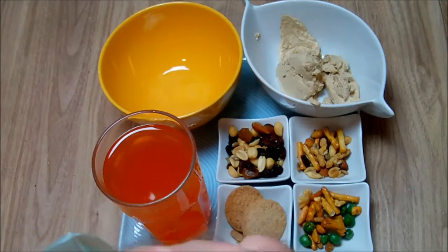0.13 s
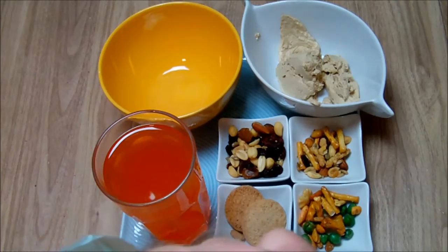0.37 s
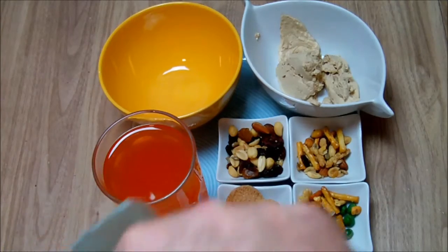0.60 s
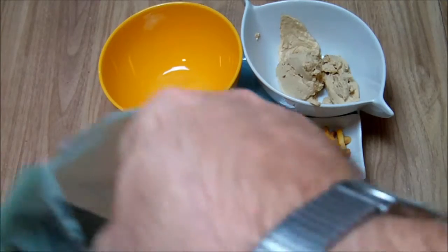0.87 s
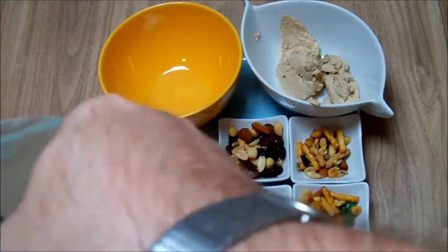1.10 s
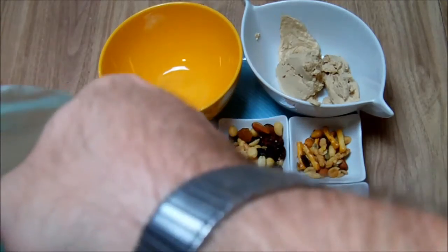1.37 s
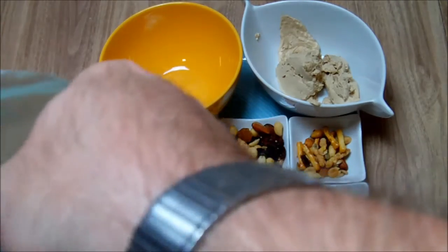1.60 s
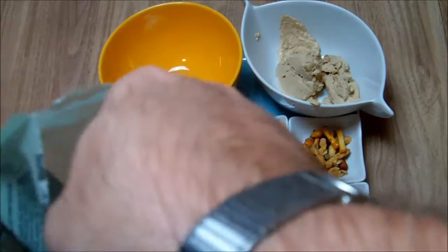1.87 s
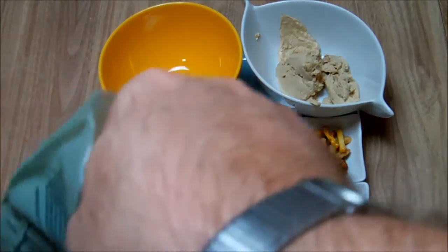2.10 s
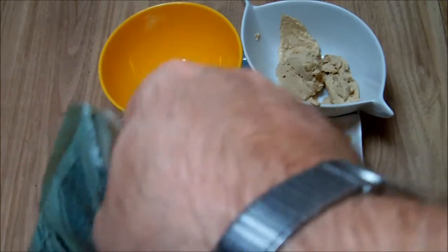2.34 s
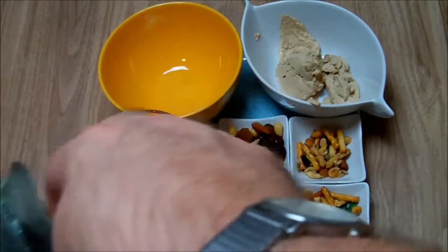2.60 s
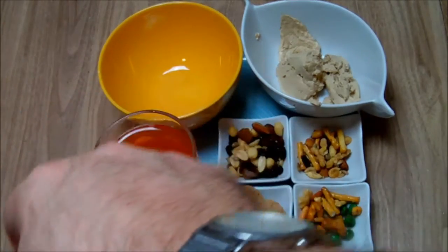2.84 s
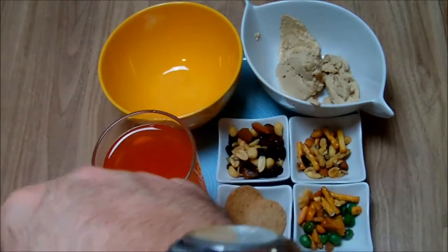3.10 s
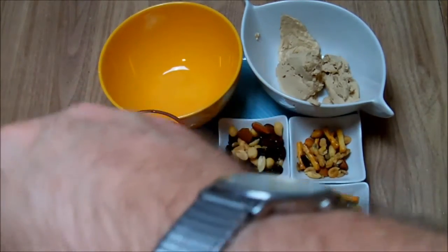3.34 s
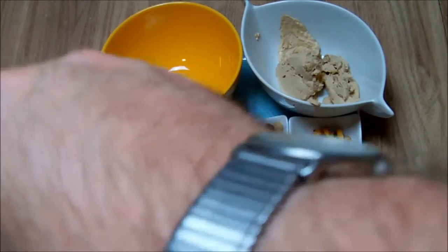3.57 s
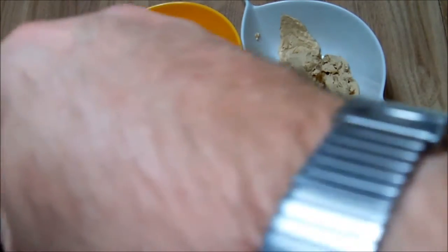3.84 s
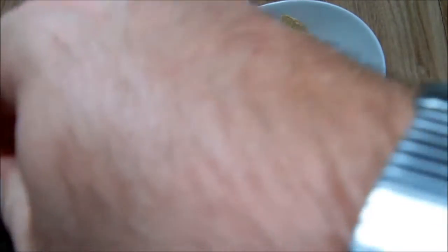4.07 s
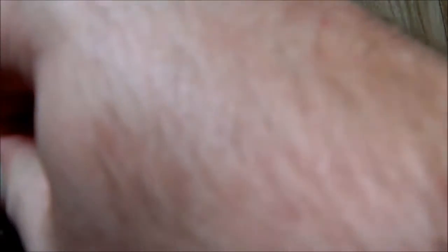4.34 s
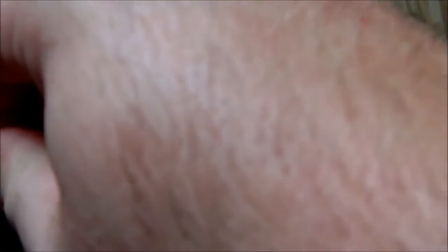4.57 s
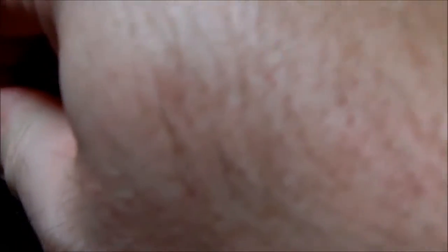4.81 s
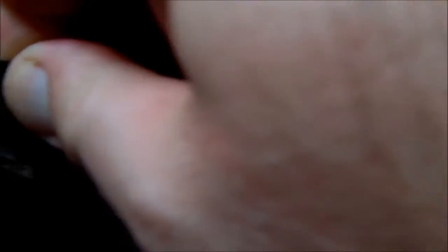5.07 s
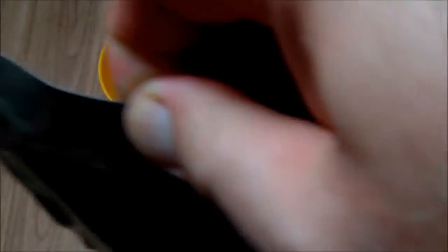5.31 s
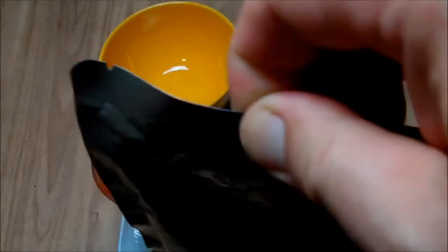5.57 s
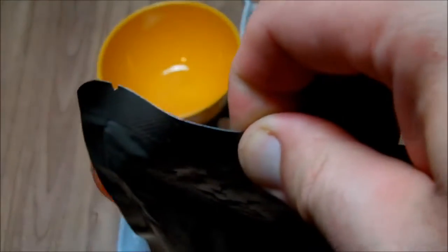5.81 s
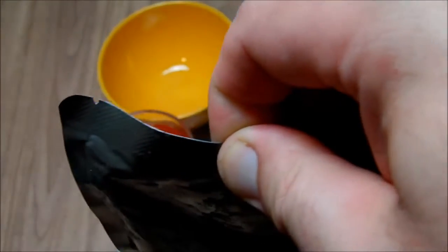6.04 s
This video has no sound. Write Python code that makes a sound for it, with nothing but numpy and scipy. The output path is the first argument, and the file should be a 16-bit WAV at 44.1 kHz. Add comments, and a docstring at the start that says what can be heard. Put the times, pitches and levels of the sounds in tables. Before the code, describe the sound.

In a quiet, bare room, a filled foil pouch is handled close to a single microphone. Several dry, middling snaps come in the first 0.4 seconds, then a brief lull. From 0.7 they resume, with very sharp, bright cracks near 1.0 and 1.1. After sparse ticks, crackling gathers from 1.75 and becomes densest and loudest around 2.05 to 2.25, with crushing rustle and fine finger scrape; busy snaps continue until 2.9. A crisp cluster follows at 3.2 to 3.45, then small, faint high ticks and soft rustling around 3.9 to 4.1. Isolated pops stand out near 4.57 and 4.72, fine crackle at 5.0, and a snap at 5.5. Bright cracks return at 5.85 and 5.95, ending in a sharp crinkling burst from 6.1. Dull crumples underlie the snaps; a soft room tail and slowly swelling airy hush remain behind.

```python
"""Over the hush of a quiet, bare room, a foil pouch snaps and ticks, close to a one-microphone camera.
Each snap of a crease or high tick of skin on film is a sharp flick and a rattle, with a dull crumple
of the filled body under it. The table gives a quick echo and the room a long soft tail.
Fingers slide on the film as a fine crackle, and the gripped sheet rustles: both are swarms of
random clicks, each a short noisy ring. The hush is shaped noise that slowly swells."""
import sys
import numpy as np
from scipy import signal
from scipy.fft import rfft, irfft, next_fast_len
from scipy.io import wavfile

SR = 44100
rng = np.random.default_rng(int(sys.argv[2]) if len(sys.argv) > 2 else 0)


def nominal_scale(level):
    """Amplitude ratio for a level in decibels (scalar or array-like)."""
    x = np.asarray(level, float) / 20
    return 10 ** x


def pcm_store(signal):
    """Save signal as 16-bit PCM."""
    levels = np.round(np.clip(np.atleast_2d(signal), -1, 1) * 32767)
    wavfile.write(sys.argv[1], SR, levels.astype(np.int16).T)


N = 272449
TIME = np.arange(N) / SR  # seconds


def shape(table, hz):
    """Gain of a (Hz, dB) table, read along a log frequency axis."""
    f, db = np.transpose(table)
    return nominal_scale(np.interp(np.log(hz + 1), np.log(f), db))


def colour(x, gain):
    """Filter by a gain function of Hz."""
    size = next_fast_len(x.shape[-1])
    spectrum = rfft(x, size) * gain(np.fft.rfftfreq(size, 1 / SR))
    return irfft(spectrum, size)[..., :x.shape[-1]]


def unit(x):
    """Scale to rms 1."""
    return x / np.sqrt(np.mean(x ** 2))


def peak(hz, centre_hz, width_hz):
    """Response of one resonance, gain 1 at its centre."""
    return 1j * hz * width_hz / (centre_hz ** 2 - hz ** 2 + 1j * hz * width_hz)


def ring_down(t, t60_s):
    """Exponential decay that falls 60 dB in t60_s."""
    return np.exp(-np.log(1000) * t / t60_s)


# Colour of the room's air. Each row: frequency in Hz, relative density in dB per Hz.
HUSH_COLOUR = [(12, -57), (20, -7.5), (70, -8), (357, -2), (759, -4), (949, -3.5), (1330, -2), (3070, -7),
               (5680, -13), (12400, -17), (14700, -22.5), (16000, -38)]
# The slow swell of the air. Each row: time in seconds, change of level in dB.
HUSH_SWELL = [(0, -2), (2, 4), (4, 4), (6.18, 7)]
HUSH_BASE_DB = -67.5  # rms before the swell


def hush():
    """Air of the room: noise with a fixed colour and a slowly swelling level."""
    noise = rng.standard_normal(N)
    air = unit(colour(noise, lambda hz: shape(HUSH_COLOUR, np.minimum(hz, 14700))))
    swell_db = np.interp(TIME, *np.transpose(HUSH_SWELL))
    return nominal_scale(HUSH_BASE_DB + swell_db) * air


# Snapping creases, and fine high ticks of skin on film. Each row: time in seconds, level in dB,
# resonance in Hz, lows in dB and highs in dB that set the tilt of the spectrum.
SNAPS_AND_TICKS = [(0.0476, -28, 854, -20.5, -6.5), (0.0996, -32, 3900, -14.5, -10),
                   (0.161, -50, 8000, -30, 1), (0.236, -53, 6000, -30, 0), (0.2587, -26, 1300, -12.5, 0),
                   (0.2998, -30.5, 3180, -26, -4), (0.3355, -27, 1360, -14, -7),
                   (0.342, -35.5, 9000, -30, 9), (0.687, -32, 1200, -27, -19), (0.6942, -38, 4000, -15, -3),
                   (0.714, -37, 1730, -7, -13), (0.7353, -30, 1780, -17, -2),
                   (0.7506, -22.5, 4020, -16.5, 3), (0.867, -39, 1960, -3, -17),
                   (0.933, -41.5, 1200, -6, -21), (0.9628, -39, 2240, -8, -21),
                   (0.9688, -33, 6900, -13, -23), (0.9834, -12.5, 12000, -20, 1.5),
                   (1.0346, -27.5, 4610, -21, 2), (1.0734, -32, 2220, -35, 2), (1.0927, -15, 8100, -19, 6),
                   (1.15, -25, 8500, -17.5, -5), (1.3882, -25, 2800, -25.5, -10),
                   (1.6088, -42, 1970, -12, -21), (1.7507, -28.5, 6550, -5, 3), (1.763, -27, 5500, -20, 2),
                   (1.7746, -33, 2010, -20, -13), (1.801, -30.5, 2370, -6, -3),
                   (1.8172, -24.5, 2190, -12, -1), (1.8286, -31.5, 2270, -24, -2),
                   (1.867, -30.5, 1940, -22, -37), (1.911, -25.5, 1770, -10, 2), (1.9173, -28, 1770, -2, 3),
                   (1.9255, -25, 2020, -17, 1), (2.065, -17, 3800, -5.5, 8.5),
                   (2.0796, -15, 5800, -11.5, -7), (2.0965, -16, 5360, -26, 3),
                   (2.117, -20.5, 2270, -6, -9), (2.1326, -18, 10300, -16, -17),
                   (2.1586, -35, 6210, -20, -10), (2.216, -18.5, 6840, -17, -1),
                   (2.2272, -20.5, 1960, -20, -9), (2.2397, -20.5, 8500, -25, -29),
                   (2.2552, -32, 2290, -18, -13), (2.346, -30.5, 3020, -31, -2.5),
                   (2.3678, -33, 1120, -9, -8), (2.4142, -26, 1110, -17.5, -11),
                   (2.484, -24, 2700, -32, -6), (2.5064, -31, 4040, -20, -14), (2.5287, -40, 2880, -24, 1),
                   (2.5566, -32, 10100, -32, -13), (2.5681, -37, 4310, -32, -9),
                   (2.59, -31, 10400, -30, -15), (2.5953, -29, 7450, -23, -26),
                   (2.6475, -19, 2850, -18, 4.5), (2.684, -25.5, 1810, -22, -2), (2.71, -21, 2300, -32, -6),
                   (2.7288, -26.5, 5080, -13, 0), (2.7615, -20.5, 8700, -14.5, -8),
                   (2.7792, -25.5, 5000, -24, -2), (2.806, -22.5, 3220, -36, 4),
                   (2.814, -29, 2880, -27, -11), (2.8572, -16, 9800, -15.5, 2),
                   (2.8875, -27, 2720, -13, -16), (3.1982, -25.5, 2980, -19, 0),
                   (3.202, -19, 2700, -16, 4.5), (3.2957, -20, 5800, -20, -5),
                   (3.3949, -30, 2570, -29, -29), (3.431, -31, 6160, -29, 3),
                   (3.458, -26.5, 1360, -7.5, -3), (3.57, -38.5, 1300, -36, -10),
                   (3.643, -35, 2820, -25, 0), (3.6533, -35, 3230, -23, -7), (3.7519, -41, 2000, -33, -10),
                   (3.909, -41.5, 9960, -22, 7), (3.945, -40, 10400, -27, 1),
                   (3.9517, -36.5, 10300, -24, 6), (3.9614, -36.5, 8840, -12, -7),
                   (3.9838, -31, 9500, -38, -8), (4.028, -33, 10100, -25, 6), (4.067, -32, 10400, -29, 3),
                   (4.125, -32.5, 3340, -25, 2), (4.2311, -39.5, 2040, -16, -47),
                   (4.4623, -38, 3230, -13, -42), (4.5691, -22.5, 2400, -35, -6.5),
                   (4.7191, -20.5, 4040, -19, -1), (4.949, -40, 10100, -25, 5), (5.002, -36, 9980, -23, -3),
                   (5.02, -30, 9350, -20, 12), (5.043, -33.5, 10200, -12, 6), (5.163, -40, 10100, -28, -3),
                   (5.4816, -27.5, 4270, -14.5, -5.5), (5.507, -34, 1180, -22, -11),
                   (5.7506, -38.5, 1850, -18, -25.5), (5.7899, -26.5, 2270, -10, -8),
                   (5.8452, -15, 10700, -19, 1), (5.852, -25, 9000, -25, 7), (5.8653, -31, 2520, -22, -16),
                   (5.8843, -32.5, 4860, -12, -19), (5.9477, -19.5, 3200, -13, -7),
                   (5.962, -30.5, 2000, -8, -25), (6.015, -29, 1940, -4.5, -38),
                   (6.031, -39, 1300, -4, -37), (6.048, -35, 2680, -4, -13), (6.099, -18.5, 10500, -33, 7),
                   (6.1589, -14.5, 6900, -18, 6)]
SNAP_LAG_S = .0008  # each flick sounds this long after its listed time
HISS_T60_S, DRUM_T60_S = 0.017, 0.042
RATTLE_DB = -8.5  # rattle after each flick


def snaps_and_ticks():
    """Each snap or tick is a sharp flick, then a resonant rattle that loses its treble first."""
    size, lead = 4096, 256  # samples; the lead leaves room for the filter's ringing ahead of the flick
    out, t = np.zeros(N + size), TIME[:size]
    hz = np.fft.rfftfreq(size, 1 / SR)
    rattles = rng.standard_normal((len(SNAPS_AND_TICKS), 2, size))
    for (s, db, ring_hz, low_db, high_db), (bright, dull) in zip(SNAPS_AND_TICKS, rattles):
        flick = 0.11 * bright * np.exp(t / -.0004)
        flick[0] += 1.6
        hiss = bright * ring_down(t, HISS_T60_S)
        drum = dull * ring_down(t, DRUM_T60_S)
        tilt = shape([(60, low_db - 41), (300, low_db - 4), (1000, low_db + 10), (2200, 0.5 * low_db + 8.5),
                      (4500, 0.049 * low_db + 0.17), (10000, high_db + 3.5), (16000, high_db - 8.0)], hz)
        resonance = 1.47 * peak(hz, ring_hz, 0.18 * ring_hz)
        muffled_drum = rfft(drum) / (1 + 1j * hz / 4000)
        wave = rfft(flick + nominal_scale(RATTLE_DB) * hiss) + nominal_scale(RATTLE_DB) * muffled_drum
        sound = np.roll(irfft(wave * (tilt + resonance)), lead)
        # the level follows the energy up to 64 samples past the flick
        sound = sound / np.sqrt(np.sum(sound[:lead + 64] ** 2) / 6)
        at = int((s + SNAP_LAG_S) * SR) - lead
        out[at:at + size] += nominal_scale(db) * sound
    return out[:N]


BUILD_DB = 30.5  # how far a movement climbs during its build-up


def effort(rows, fade_db_per_s, rest_db):
    """Level in dB of movements that build up, hold and fade; their powers add to that of a still hand."""
    power = nominal_scale(rest_db) ** 2
    for s, build_s, hold_s, db in rows:
        below_before = BUILD_DB * (s - TIME) / max(build_s, 1e-3)
        below_after = fade_db_per_s * (TIME - s - hold_s)
        drop = np.maximum(below_before, below_after)
        power = power + nominal_scale(db - np.clip(drop, 0, 99)) ** 2
    return 10 * np.log10(power)


def swarm(db, per_s, spread_db, ring_s):
    """Random clicks, many small and few large, each a short noisy ring; a higher level packs them closer."""
    rate = np.clip(per_s * nominal_scale(.6 * (db + 62.0)), 100, 6000)  # clicks per second
    sizes = nominal_scale(spread_db * np.minimum(rng.exponential(size=N), 4))
    clicks = (rng.random(N) < rate / SR) * sizes
    fade = ring_down(TIME[:2048], max(ring_s, 1e-3))
    power = signal.fftconvolve(clicks ** 2 / rate, fade ** 2)[:N]
    return unit(np.sqrt(np.abs(power)) * rng.standard_normal(N))


BODY_DB, BODY_RISE_S = -23.5, .015  # the level adds to the level and lows of each snap or tick
BODY_FADE_DB_PER_S, BODY_REST_DB = 209, -75


def body_crumple():
    """Dull crumples of the filled body under each snap or tick: a swarm through two low resonances."""
    jolts = [(s + BODY_RISE_S, BODY_RISE_S, 0, db + low_db + BODY_DB)
             for s, db, _, low_db, _ in SNAPS_AND_TICKS]
    body_db = effort(jolts, BODY_FADE_DB_PER_S, BODY_REST_DB)
    clicks = swarm(body_db, 200, 2.35, 0.048)
    body = unit(colour(clicks, lambda hz: peak(hz, 313, 360) ** 2 + 2.2 * peak(hz, 847, 540)))
    return nominal_scale(body_db) * body


# How long the bare room rings. Each row: band centre in Hz, time to fall 60 dB in seconds.
ROOM_DECAY = [(200, 0.15), (800, 0.56), (2500, 0.61), (6000, 0.24), (12000, 0.18)]
ROOM_GAP_S = 0.01  # the tail swells in over about this time


def tail():
    """A diffuse answer of the room that dies band by band, scaled to energy 1."""
    t, out = TIME[:SR], 0
    for (centre_hz, t60_s), noise in zip(ROOM_DECAY, rng.standard_normal((len(ROOM_DECAY), SR))):
        band = colour(noise, lambda hz: peak(hz, centre_hz, centre_hz))
        out = out + band * ring_down(t, t60_s)
    out = out * (1 - np.exp(-(t / ROOM_GAP_S) ** 2))
    return out / np.sqrt(np.sum(out ** 2))


ROOM_DB = -8.5
TABLE_S, TABLE_SHARE = 0.000696, 0.043  # delay and gain of the echo off the table top


def room(x, count=6):
    """The quick echo from the table, then the tail; the pouch keeps moving, so the tail keeps changing."""
    out = colour(x, lambda hz: 1 + TABLE_SHARE * np.exp(-2j * np.pi * hz * TABLE_S))
    place = TIME * 25 % count  # passes 25 tails a second, round and round
    for k in range(count):
        away = np.abs((place - k + count / 2) % count - count / 2)
        share = np.cos(np.pi / 2 * np.minimum(away, 1))
        out = out + nominal_scale(ROOM_DB) * signal.fftconvolve(x * share, tail())[:N]
    return out


# Fingers that slide on the film. Each row: full from in seconds, build-up in seconds,
# hold in seconds, level in dB.
FINGER_SLIDES = [(.9, 0.43, .03, -73), (1.07, .03, 0.065, -64), (1.54, 0.11, 0.028, -64),
                 (1.85, 0.17, 0.067, -67), (2.08, .06, .02, -55), (2.16, .05, 0.046, -47),
                 (2.57, 0.086, 0.18, -55), (2.88, .1, .02, -63), (3.25, 0.11, 0.051, -52.5),
                 (3.4, .1, 0.21, -69), (3.95, .1, 0.033, -62), (4.03, .1, 0.072, -57.5),
                 (4.76, .04, 0.14, -66), (4.955, .04, .02, -60), (5.01, 0.083, 0.046, -52),
                 (5.15, .1, 0.033, -66), (5.85, 0.035, 0.083, -57), (6.088, 0.009, 0.037, -40)]
SLIDE_FADE_DB_PER_S, FINE_REST_DB = 145, -85
FINE_HZ, FINE_WIDTH_HZ = 10200, 3400


def film_drag():
    """A finer crackle where skin drags on the film: dense, brief clicks through a high resonance."""
    fine_db = effort(FINGER_SLIDES, SLIDE_FADE_DB_PER_S, FINE_REST_DB)
    clicks = swarm(fine_db, 900, 3.4, 0.0027)
    fine = unit(colour(clicks, lambda hz: peak(hz, FINE_HZ, FINE_WIDTH_HZ) ** 2))
    return nominal_scale(fine_db) * fine


# Grips that crush the sheet. Each row: full from in seconds, build-up in seconds,
# hold in seconds, level in dB.
CRUSHING_GRIPS = [(1.0, .03, 0.25, -73), (1.54, 0.12, 0.024, -65.5), (1.8, .15, 0.092, -65),
                  (1.925, .05, 0.0092, -63), (2.075, 0.036, 0.13, -43.5), (2.21, .05, 0.021, -52),
                  (2.63, 0.2, 0.026, -46.5), (2.72, .1, 0.18, -52), (3.21, 0.027, 0.15, -49.5),
                  (3.4, .1, 0.15, -57), (3.6, .1, 0.11, -60.5), (4.07, 0.33, 0.068, -58),
                  (4.59, 0.056, 0.33, -62.5), (5.02, 0.26, 0.071, -59), (5.85, .1, .22, -71),
                  (6.088, .01, .02, -51), (6.115, .04, 0.017, -40)]
# Colour of the rustling sheet. Each row: frequency in Hz, relative density in dB per Hz.
SHEET_COLOUR = [(88, -55), (150, -27), (259, -12), (545, -13.5), (774, -6.5), (1260, 1), (7770, -2.5),
                (9440, -4.5), (14500, -10.5), (16000, -50)]
GRIP_FADE_DB_PER_S, SHEET_REST_DB = 135, -78.5


def sheet_rustle():
    """Small buckles all over the sheet: a swarm of clicks with the sheet's own colour."""
    sheet_db = effort(CRUSHING_GRIPS, GRIP_FADE_DB_PER_S, SHEET_REST_DB)
    clicks = swarm(sheet_db, 300, 2.03, 0.028)
    sheet = unit(colour(clicks, lambda hz: shape(SHEET_COLOUR, np.minimum(hz, 14700))))
    return nominal_scale(sheet_db) * sheet


def scene():
    """Pouch, room and hush all reach one microphone."""
    pouch = snaps_and_ticks() + body_crumple() + film_drag() + sheet_rustle()
    mono = room(pouch) + hush()
    return np.array([mono, mono])


# Response of the microphone, with a notch. Each row: frequency in Hz, gain in dB.
MICROPHONE_RESPONSE = [(20, -4.5), (7400, 1), (7800, -6.5), (8200, 0), (15000, 0)]
# The cut top of its range. Each row: frequency in Hz, gain in dB.
TOP_CUT = [(15250, 0), (15400, -30), (16500, -36)]


def microphone(x):
    """Filter by the microphone's response and its cut top."""
    return colour(x, lambda hz: shape(MICROPHONE_RESPONSE, hz) * shape(TOP_CUT, hz))


# Faint noise between the channels. Each row: frequency in Hz, level in dB relative to the hush.
SIDE_LEVEL = [(60, -15), (250, -17.5), (800, -14), (1500, -21.5), (3000, -16.5), (8000, -11), (14000, -10)]


def side_noise():
    """A fresh draw of hush-like noise, turned down band by band."""
    return microphone(colour(hush(), lambda hz: shape(SIDE_LEVEL, hz)))


def roll_off(x):
    """The treble ends steeply here."""
    return signal.sosfilt(signal.butter(12, 16530, fs=SR, output="sos"), x)


def record(dry):
    """One microphone feeds both channels; a faint noise joins them in opposite polarity."""
    mid = microphone(dry[0])
    side = side_noise()
    return roll_off(np.array([mid + side, mid - side]))


dry = scene()
out = record(dry)
pcm_store(out)
```